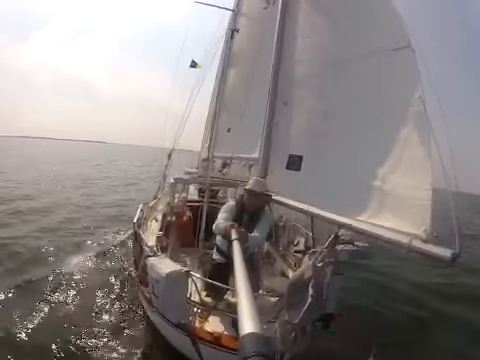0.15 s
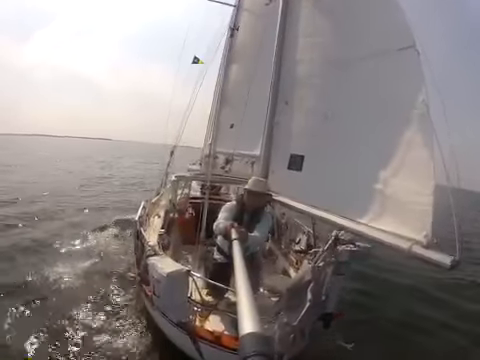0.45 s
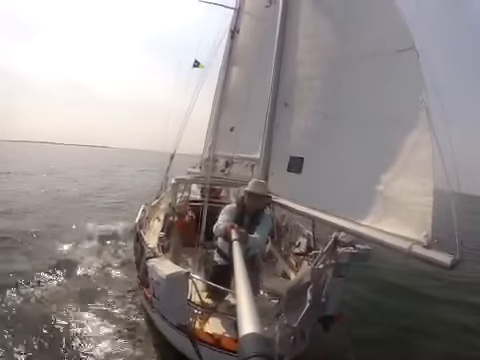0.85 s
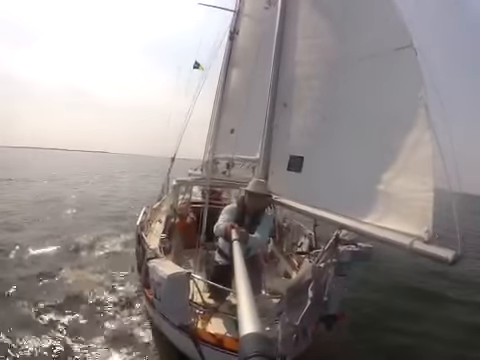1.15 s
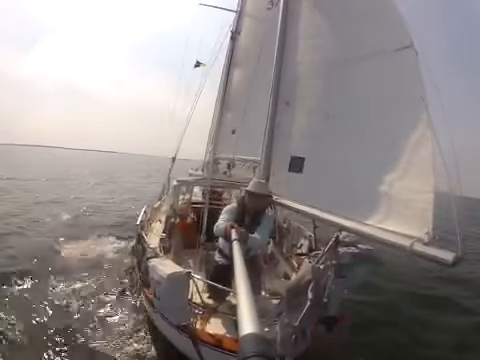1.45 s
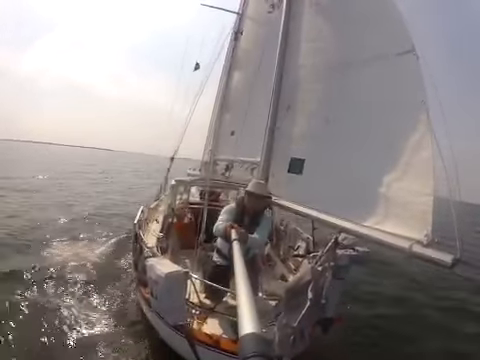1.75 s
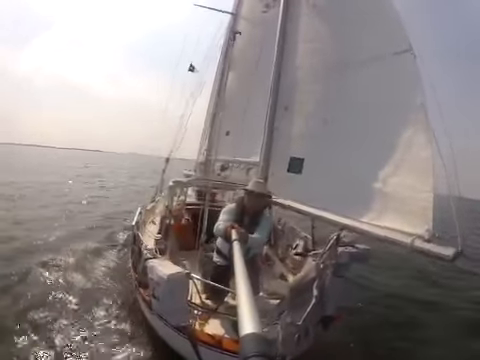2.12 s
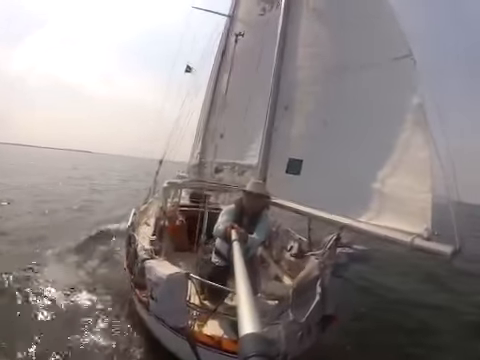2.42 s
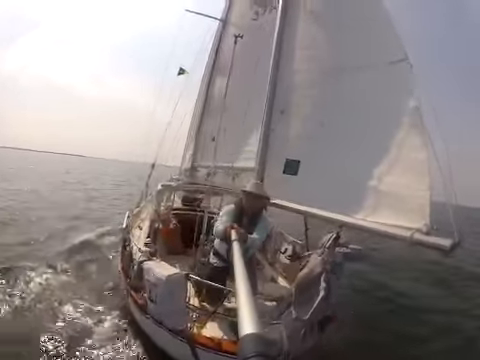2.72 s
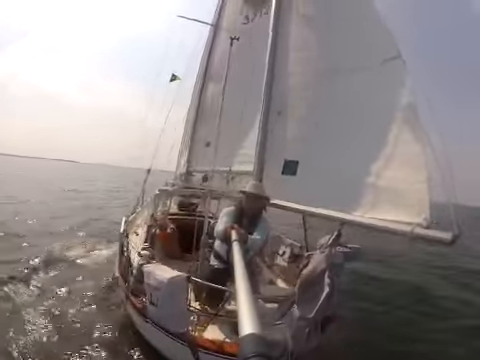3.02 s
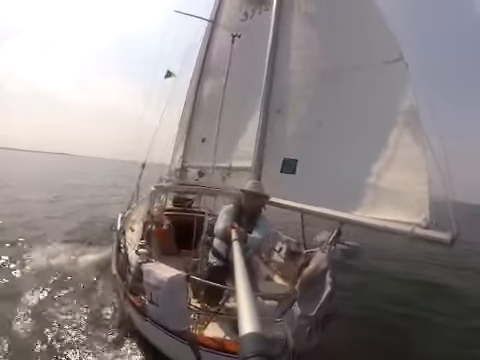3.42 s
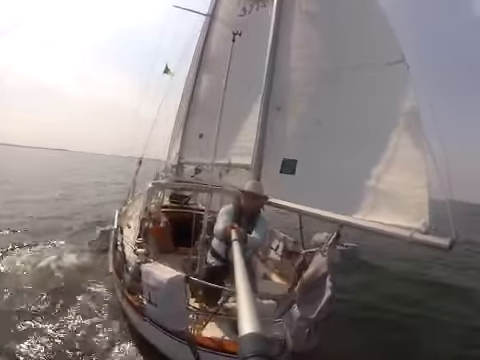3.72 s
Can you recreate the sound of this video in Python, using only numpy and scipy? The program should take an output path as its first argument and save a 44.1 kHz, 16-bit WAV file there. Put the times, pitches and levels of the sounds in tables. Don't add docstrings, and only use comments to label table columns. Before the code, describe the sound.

Water washes and gurgles continuously behind a small sailboat, muffled and boxy inside a sealed housing, over deep fluttering wind rumble. Spray ticks throughout, sharpest near 0.6 and 2.75 s. Faint dry squeaks repeat about eight times a second until 1.3, again 2.2-2.9 and after 3.55, with tiny chirps. A dull hull thud at 0.75, a quick fitting rattle at 1.3, low pole jolts at 1.4, 2.8 and 3.1. Bubbling thickens around 2.3.

```python
import sys
import numpy as np
from scipy import signal
from scipy.fft import rfft, irfft, next_fast_len
from scipy.io import wavfile
from scipy.ndimage import uniform_filter1d, map_coordinates

SR = 44100
rng = np.random.default_rng(int(sys.argv[2]) if len(sys.argv) > 2 else 0)


def wav_record(signal):
    frames = np.transpose(np.atleast_2d(signal))
    bounded = np.clip(frames, -1, 1)
    quanta = np.round(bounded * 32767).astype(np.int16)
    wavfile.write(sys.argv[1], SR, quanta)


def gain_from_db(level_db):
    decades = np.asarray(level_db, float) / 20
    return 10 ** decades


N = 170667

# [time_s, mode1_db, mode2_db, mode3_db]
POLE_LEVELS = [(0, -46, -54, -74), (.35, -48.5, -52, -61), (.75, -49, -53.5, -64.5), (1.0, -45, -58, -68),
               (1.28, -55, -49.5, -61.5), (1.55, -54.5, -63.5, -66), (1.9, -47, -58, -63),
               (2.2, -48.5, -51.5, -63), (2.45, -47.5, -58, -59.5), (2.75, -51, -52, -58.5),
               (3.3, -49, -56, -56.5), (3.87, -51.5, -54.5, -57.5)]
# [pitch_hz, width_hz]
POLE_MODES = [(25, 12.3), (70, 18.2), (119, 15)]
# [time_s, swell_db]
PUFFS = [
    [(.12, 2), (.3, 5), (.62, 4), (.76, 3), (.94, 10), (1.06, 10), (1.23, 5), (1.38, 4), (1.55, 5),
     (1.96, 6.5), (2.11, 6.5), (2.25, 2.5), (2.36, 4.5), (2.65, 5.5), (2.78, 6.5), (3.12, 4), (3.51, 8.5),
     (3.66, 1.5), (3.84, 3.5)],
    [(.3, 9.5), (.57, 10), (.78, 8.5), (.94, 14), (1.06, 10), (1.22, -1), (1.55, 7), (1.76, 10),
     (1.84, 3.5), (2.11, 11), (2.3, 3.5), (2.43, 8.5), (2.62, 2.5), (2.93, 6), (3.11, 8), (3.34, 9),
     (3.48, -2), (3.62, 5.5), (3.81, 5.5)],
]
# [pitch_hz, level_db per Hz]
WIND_SPECTRUM = [(5, -16.5), (10, -3), (45, -7.5), (130, -15.5), (200, -20.5), (330, -23.5), (900, -36),
                 (3000, -50)]
# [start_s, level_db, pitch_hz, t60_s, direction]
JOLTS = [
    (1.371, -33, 53.6, 0.096, -1),
    (2.775, -31, 24.5, 0.17, 1),
    (3.091, -45.5, 145, 0.15, -1),
]
# [pitch_hz, width_hz, level_db]
HOUSING_MODES = [(1120, 167, -1), (1380, 164, -5.5), (1860, 180, 1.5), (2324, 270, -0.5), (2492, 154, 1),
                 (3084, 205, -3), (3390, 330, -5.5), (3726, 125, -3.5), (4100, 130, -8), (4610, 290, -2),
                 (5300, 540, -12.5)]
# [time_s, level_db]
WAKE_LEVEL = [(0, -67.5), (.12, -69.5), (.55, -69), (.8, -68.5), (.97, -63.5), (1.06, -72), (1.2, -69),
              (1.5, -72.5), (1.9, -71), (2.15, -66.5), (2.3, -66), (2.6, -67), (2.98, -66), (3.08, -72.5),
              (3.4, -71), (3.6, -72.5), (3.87, -68.5)]
# [start_s, peak_db, pitch_hz, spray_db over the peak]
TICKS = [(.06, -52, 2350, -2), (.441, -69, 2220, 3), (.594, -45, 2420, 0), (0.681, -44, 2420, 1),
         (.86, -57, 2570, 3), (1.929, -52.5, 4880, 5), (2.035, -50.5, 3290, 7), (2.096, -58, 2120, 1),
         (2.294, -53, 4930, 8), (2.368, -49.5, 2200, 3), (2.515, -48, 2386, 1), (2.742, -56, 2400, 5),
         (2.748, -42.5, 2320, 4), (2.754, -50, 3930, 7), (3.017, -51, 3300, 6), (3.342, -54.5, 5430, 0),
         (3.421, -52, 2365, 4), (3.752, -49.5, 2510, 8.5), (3.823, -56, 2340, 5)]
# [start_s, level_db]
CHIRPS = [(.168, -73), (0.27, -72.5), (0.434, -81), (.558, -76), (.66, -74), (1.271, -76), (1.389, -77),
          (1.424, -75), (1.514, -77), (1.634, -78), (1.87, -75.5), (1.985, -74.5), (2.105, -74),
          (2.165, -74), (2.222, -74), (2.44, -82), (2.68, -75), (3.064, -75), (3.185, -74.5), (3.244, -78),
          (3.305, -75), (3.365, -78), (3.422, -76), (3.545, -75)]
# [start_s, level_db, clear_voice_db over it, opening_glide_db]
TURNS = [(.185, -62.5, -13, -16), (.29, -72.5, -0.5, 0.3), (.41, -71, 0, -2), (.528, -72.5, 0, 1.5),
         (.647, -69.5, -4, 0), (.778, -69.5, -1.5, 7), (.9, -72, -4, 3), (1.02, -67.5, -12, -2.5),
         (1.15, -71, -8.5, -5), (2.223, -74.5, 2.5, -23), (2.335, -68.5, -7, -1.5),
         (2.458, -68.5, -4.5, -4), (2.575, -67, -8.5, -3), (2.7, -74, -11, 6), (2.815, -70, -7, 1),
         (3.565, -67, -10.5, 3), (3.668, -66, -10.5, 6), (3.785, -67.5, -9.5, -4)]
# [time_s, pitch_hz, level_db]
SQUEAK_ARC = [(0, 3600, 5.5), (.011, 3800, 3), (.022, 4060, -1.5), (.045, 4050, -8), (.058, 4180, 1.5),
              (0.085, 4190, -0.5), (.093, 3900, -9), (.102, 3720, 3), (.117, 3620, -7)]
# [pitch_hz, level_db, t60_s]
HULL_MODES = [(161, 10, 0.05), (487, 2, 0.056), (755, 5, 0.025), (1170, 8, 0.026)]
# [start_s, peak_db, pitch_hz]
GLUGS = [(0.8612, -57, 1160), (0.9417, -53.5, 1207), (0.9796, -65, 1860), (1.014, -55, 1080),
         (1.049, -62, 1050), (1.104, -51, 1113), (1.282, -57, 1090), (1.329, -57.5, 1110),
         (1.948, -59, 1080), (2.07, -66, 1010), (2.0914, -56, 2060), (2.187, -61, 1170), (2.26, -68, 1200),
         (2.281, -57, 1194), (2.303, -50.5, 1240), (2.318, -49.5, 1043), (2.36, -52.5, 1400),
         (2.398, -54, 1130), (2.4007, -64, 1900), (2.508, -54, 1130), (2.562, -56, 1920),
         (2.588, -59, 1850), (2.612, -59, 1860), (2.655, -60, 1840), (2.675, -58, 1860), (2.698, -57, 1804),
         (2.803, -57, 1860), (2.83, -61, 1150), (2.848, -59, 1206), (2.936, -52.5, 1840),
         (2.983, -61, 1820), (3.444, -57, 1090), (3.496, -56, 1166), (3.597, -54.5, 1836)]
# [start_s, level_db]
RATTLE = [
    (1.2969, -62),
    (1.3015, -53.5),
    (1.3062, -51.5),
    (1.3125, -66),
    (1.325, -59),
    (1.337, -68),
]
# [pitch_hz, level_db, t60_s]
FITTING_MODES = [(2260, -1, 0.015), (2450, -8, 0.023), (2507, 6, 0.043), (3604, -4, 0.04), (3750, -6, .02),
                 (4500, -17, 0.017)]
# [pitch_hz, level_db per Hz]
PORT_HISS = [(50, -24), (110, -15), (200, 1), (500, -8), (1100, -12), (2500, -12), (4700, -10.5),
             (5600, -15)]
# [pitch_hz, level_db]
BAND_EDGE = [(5000, 0), (5400, -1.5), (5700, -4.5), (5950, -3), (6150, -33.5)]

PUFF_S, CALM_DB = 0.028, -2.5
HEAVE_HZ, HEAVE_DB = 14.3, -53.5
WIND_DB, GUST_DB = -54, 0.97
LEAK_DB = -14.5
STILL_DB, FOAM_DB, GRAIN_DB = -68, 0.37, -5.5
GRAIN_HZ, GRAIN_SPREAD, GRAIN_CYCLES, GRAIN_SIZE_DB = 2091, 0.49, 6.3, 0.9
TICK_T60 = 0.019
CHIRP_HZ, CHIRP_RISE_HZ, CHIRP_S, CHIRP_DB = 4400, 367, 0.02, 8
SQUEAK_DB, OPENING_S = 3, 0.017
UNDER_HZ, UNDER_DB = 3775, -3
THUD_S, THUD_DB = 0.748, -55
GLUG_T60, GLUG_RISE_S, GLUG_DB = 0.049, 0.005, 2.5
MODE_SCATTER_DB = 1.2
PORTS_DB = -75.5
TOP_HZ, SIDE_TOP_HZ = 15320, 8900
SIDE_DROP_DB = -21


def unit(x):
    return x / np.sqrt(np.mean(x ** 2) + 1e-30)


def along(points, hz):
    f, v = np.transpose(points)
    return np.interp(np.log(hz + 1), np.log(f + 1), v)


def curves(rows):
    s, *cols = np.transpose(rows)
    return [np.interp(np.arange(N) / SR, s, c) for c in cols]


def wobble(rate):
    at = np.arange(0, N + 64, 32)
    knots = rng.standard_normal(int(N * 80 / SR) + 8)
    coarse = map_coordinates(knots, [at * min(rate, 79) / SR])
    return np.interp(np.arange(N), at, coarse)


def coloured(x, gain):
    m = next_fast_len(N)
    return unit(irfft(rfft(x, m) * gain(np.fft.rfftfreq(m, 1 / SR)), m)[..., :N])


def filtered(x, gain):
    m = 2 * next_fast_len(N // 2 + SR // 4)
    cep = irfft(np.log(gain(np.fft.rfftfreq(m, 1 / SR)) + 1e-6), m)
    cep[1:m // 2] *= 2
    cep[m // 2 + 1:] = 0
    return irfft(rfft(x, m) * np.exp(rfft(cep)), m)[..., :N]


def peak(f, hz, width):
    return (f * width) ** 2 / ((hz * hz - f * f) ** 2 + (f * width) ** 2)


def patchy(patchy_db):
    z = signal.stft(rng.standard_normal(N + 512), nperseg=512)[2]
    field = uniform_filter1d(rng.standard_normal(z.shape), size=5, axis=0)
    field = uniform_filter1d(field, size=6, axis=1)
    return unit(signal.istft(z * gain_from_db(patchy_db * unit(field)), nperseg=512)[1][:N])


def add(track, s, sound):
    part = track[round(s * SR):][:len(sound)]
    part += sound[:len(part)]


def ring(modes, attack):
    t = np.arange(SR // 10) / SR
    out = np.zeros(len(t))
    for hz, db, t60 in modes:
        level = db + MODE_SCATTER_DB * rng.normal()
        out += gain_from_db(level - 60 * t / t60) * np.sin(2 * np.pi * (hz * t + rng.random()))
    return (1 - np.exp(-t / attack)) * out


def housing(f):
    leak = gain_from_db(2 * LEAK_DB) * f ** 2 / (f ** 2 + 600 ** 2)
    modes = sum(gain_from_db(2 * db) * peak(f, hz, w) ** 1.2 for hz, w, db in HOUSING_MODES)
    return np.sqrt(leak + modes)


def spray_through_housing(spray):
    return filtered(spray, lambda f: housing(f) * f ** 2 / (f ** 2 + 1800 ** 2))


def sway(hz, width, size=5000):
    x = coloured(rng.standard_normal(N), lambda f: peak(f, hz, width) ** 1.41)
    power = uniform_filter1d(uniform_filter1d(x ** 2, size=size), size=size)
    return unit(x / np.sqrt(np.abs(power) + 0.078))


def puffed(rows):
    t = np.arange(0, N + 64, 64) / SR
    swell = sum(db * np.exp(-0.5 * ((t - s) / PUFF_S) ** 2) for s, db in rows)
    return gain_from_db(np.interp(np.arange(N) / SR, t, CALM_DB + swell))


def wind():
    rumble = coloured(patchy(patchy_db=0.8), lambda f: gain_from_db(along(WIND_SPECTRUM, f)))
    out = gain_from_db(WIND_DB + GUST_DB * wobble(2.03)) * rumble
    out += gain_from_db(HEAVE_DB) * sway(HEAVE_HZ, 5.2)
    (low_hz, low_width), *upper_modes = POLE_MODES
    low_db, *upper_db = curves(POLE_LEVELS)
    out += gain_from_db(low_db) * sway(low_hz, low_width, size=3500)
    for (hz, width), db, puffs in zip(upper_modes, upper_db, PUFFS):
        out += gain_from_db(db) * puffed(puffs) * sway(hz, width, size=2200)
    return out


def small_bubbles(count=3000):
    start = (rng.random((count, 1)) * N).astype(int)
    k = np.arange(300)
    hz = np.clip(GRAIN_HZ * np.exp(GRAIN_SPREAD * rng.standard_normal((count, 1))), 900, 5600)
    c = hz * k / SR / GRAIN_CYCLES
    size = gain_from_db(-GRAIN_SIZE_DB * np.log(rng.random((count, 1)) + 0.0032))
    tone = np.sin(2 * np.pi * GRAIN_CYCLES * c * (1 + 0.051 * c))
    drops = size * c * np.exp(-3.5 * c) * tone
    at = start + k
    track = np.bincount(at.ravel(), drops.ravel(), N + len(k))[:N]
    return unit(filtered(track, housing))


def wake():
    wash_db, = curves(WAKE_LEVEL)
    still = coloured(patchy(patchy_db=1.05), lambda f: housing(f) ** 0.5 * (f > 400))
    foam = coloured(patchy(patchy_db=3.0), housing)
    foam *= gain_from_db(FOAM_DB + 0.33 * wobble(9.6) + 0.7 * wobble(30))
    bubbles = gain_from_db(GRAIN_DB + 1.8 * wobble(5.73)) * small_bubbles()
    return gain_from_db(STILL_DB) * still + gain_from_db(wash_db) * (foam + bubbles)


def spray_ticks():
    out, spray, t = np.zeros(N), np.zeros(N), np.arange(SR // 10) / SR
    for s, db, hz, spray_db in TICKS:
        add(out, s, gain_from_db(db) * ring([(hz, -2.5, TICK_T60)], attack=0.00077))
        burst = gain_from_db(db + spray_db - 60 * t / (1.1 * TICK_T60)) * (1 - np.exp(-t / 0.001))
        add(spray, s, burst * rng.standard_normal(len(t)))
    return out + spray_through_housing(spray)


def rotor_chirps():
    out = np.zeros(N)
    u = np.arange(int(CHIRP_S * SR)) / (CHIRP_S * SR)
    for start, level in CHIRPS:
        pitch = CHIRP_HZ * (1 + 0.0082 * rng.normal()) + CHIRP_RISE_HZ * u
        tone = np.sin(2 * np.pi * np.cumsum(pitch) / SR)
        add(out, start - CHIRP_S / 4, gain_from_db(level + CHIRP_DB) * np.sin(np.pi * u) * tone)
    return out


def rotor_squeaks():
    out = np.zeros(N)
    s, hz, db = np.transpose(SQUEAK_ARC)
    turn_t = np.arange(int(s[-1] * SR)) / SR
    slip, flutter = wobble(55), wobble(70)
    rough = coloured(rng.standard_normal(N), lambda f: peak(f, UNDER_HZ, 320))
    for start, level, clear_db, opening_db in TURNS:
        part = slice(round(start * SR), round(start * SR) + len(turn_t))
        t = turn_t[:len(slip[part])]
        pitch = np.interp(t, s, hz) * (1 + 0.00376 * rng.normal()) + 30 * slip[part]
        opening = opening_db * np.exp(-(t / OPENING_S) ** 2)
        voice = gain_from_db(clear_db + opening + np.interp(t, s, db) + 3.7 * flutter[part])
        voice *= np.sin(2 * np.pi * np.cumsum(pitch) / SR) * np.minimum(t / 0.0042, 1)
        under = gain_from_db(UNDER_DB + 2.14 * slip[part]) * rough[part]
        under *= np.sin(np.pi * t / turn_t[-1]) ** 0.17
        under *= np.exp(clear_db / 8 * t / 0.07)
        add(out, start, gain_from_db(level + SQUEAK_DB) * (voice + under))
    return out


def hull_thud():
    out = np.zeros(N)
    add(out, THUD_S, gain_from_db(THUD_DB) * ring(HULL_MODES, attack=0.0013))
    return out


def gurgles():
    out = np.zeros(N)
    for s, db, hz in GLUGS:
        add(out, s, gain_from_db(db + GLUG_DB) * ring([(hz, 0, GLUG_T60)], attack=GLUG_RISE_S))
    return out


def fitting_rattle():
    out, contact, t = np.zeros(N), np.zeros(N), np.arange(SR // 10) / SR
    for s, db in RATTLE:
        add(out, s, gain_from_db(db) * ring(FITTING_MODES, attack=0.00058))
        add(contact, s, gain_from_db(db + 7.5 - 60 * t / 0.088) * rng.standard_normal(len(t)))
    return out + spray_through_housing(contact)


def pole_jolts():
    out, t = np.zeros(N), np.arange(SR // 5) / SR
    for s, db, hz, t60, way in JOLTS:
        envelope = gain_from_db(db - 60 * t / t60) * (1 - np.exp(-t / 0.001))
        add(out, s, np.sign(way) * envelope * np.sin(2 * np.pi * hz * t))
    return out


def scene():
    shared = wind() + wake() + spray_ticks() + rotor_chirps() + rotor_squeaks()
    shared += hull_thud() + gurgles() + fitting_rattle() + pole_jolts()
    own = gain_from_db(PORTS_DB) * coloured(rng.standard_normal(N), lambda f: gain_from_db(along(PORT_HISS, f)))
    return np.array([shared + own, shared - own])


def joint_stereo(x):
    f, _, z = signal.stft([x[0] + x[1], x[0] - x[1]], SR, nperseg=2048)
    bands = np.abs(z[:, :1024]).reshape(2, 64, 16, -1).mean(axis=2)
    drop_db = SIDE_DROP_DB + 5.5 * (np.arange(64)[:, None] > 20)
    keep = np.repeat(bands[1] > gain_from_db(drop_db) * bands[0], 16, axis=0)
    keep = np.pad(keep, ((0, 1), (0, 0)))
    keep[f < 700] = True
    keep[(f > SIDE_TOP_HZ) | (abs(f - 6000) < 300)] = False
    both = [z[0] * (f < TOP_HZ)[:, None], z[1] * keep]
    mid, side = signal.istft(both, SR, nperseg=2048)[1][:, :N] / 2
    return np.array([mid + side, mid - side])


def top_cut(x):
    return signal.sosfilt(signal.butter(12, 15450, fs=SR, output="sos"), x)


def record(dry):
    limited = filtered(dry, lambda f: gain_from_db(along(BAND_EDGE, f)))
    slow = signal.resample_poly(limited, 40, 147, axis=1, window=("kaiser", 3.))
    held = signal.resample_poly(np.repeat(slow, 4, axis=1), 147, 160, axis=1)[:, :N]
    held = np.pad(held, ((0, 0), (0, N - held.shape[1])))
    mix = joint_stereo(held)
    return top_cut(mix)


dry = scene()
out = record(dry)
wav_record(out)
```